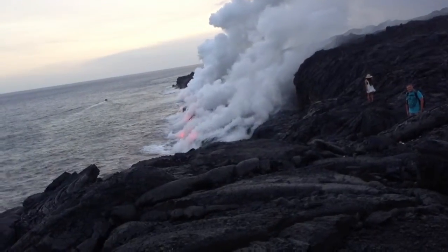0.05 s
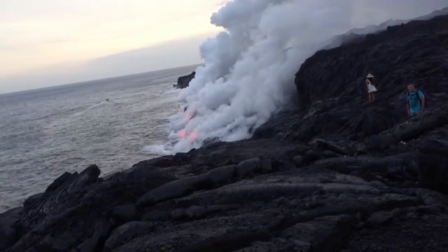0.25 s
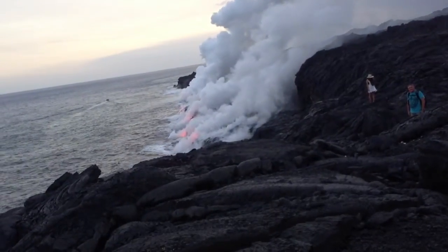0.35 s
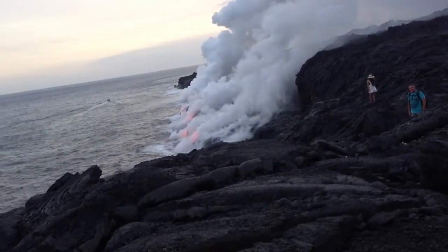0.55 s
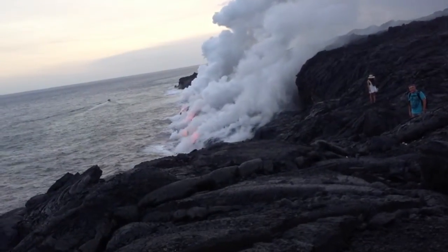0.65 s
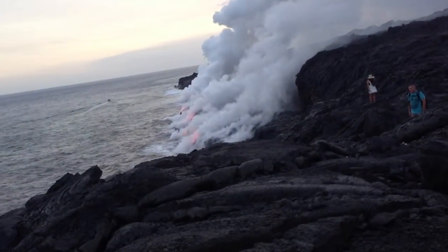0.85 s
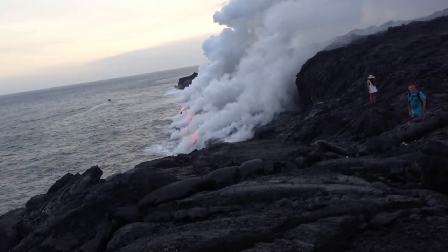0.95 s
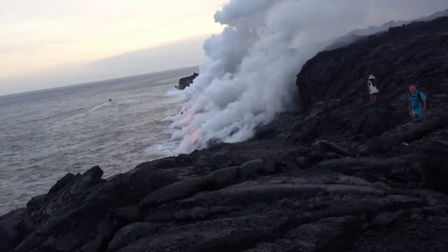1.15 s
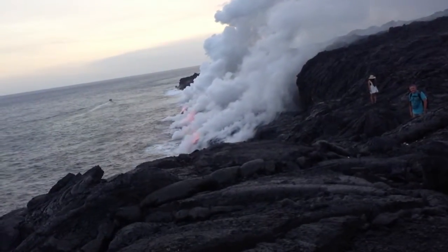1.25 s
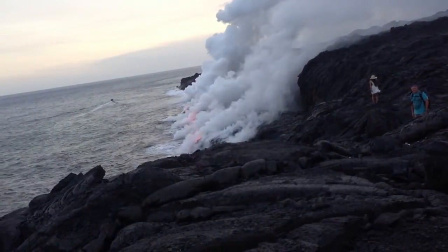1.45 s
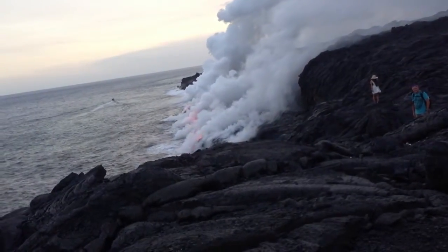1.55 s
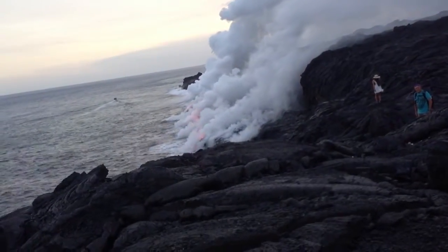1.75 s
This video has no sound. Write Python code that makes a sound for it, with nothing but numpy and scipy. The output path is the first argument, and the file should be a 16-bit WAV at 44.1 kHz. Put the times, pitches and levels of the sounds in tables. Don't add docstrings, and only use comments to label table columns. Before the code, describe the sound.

Low, uneven wind flutter dominates, right at the microphone, swelling to one heavy thump midway and gusting again near the end before sinking; far quieter surf roar, soft wave wash and airy hiss lie behind, outdoors by the sea.

```python
import sys
import numpy as np
from scipy import signal
from scipy.fft import rfft, irfft, next_fast_len
from scipy.io import wavfile
from scipy.ndimage import uniform_filter1d, map_coordinates

SR = 44100
rng = np.random.default_rng(int(sys.argv[2]) if len(sys.argv) > 2 else 0)


def how_loud(loudness_db):
    steps = np.asarray(loudness_db, float) / 20
    return 10 ** steps


def unload_wav(signal):
    wavfile.write(
        sys.argv[1],
        SR,
        np.round(np.clip(np.atleast_2d(signal).T, -1, 1) * 32767).astype(np.int16),
    )


N = 79380

# [t/s, level/dB]
WIND_STRENGTH = [(0, -44), (.27, -40), (.34, -46.5), (.44, -39), (.5, -45.5), (.6, -44), (.73, -43.5),
                 (.87, -33), (.97, -37.5), (1.05, -42), (1.08, -48), (1.2, -47), (1.3, -41), (1.35, -43),
                 (1.45, -36), (1.55, -37), (1.59, -46.5), (1.8, -48.5)]
# [f/Hz, level/dB per Hz]
RUMBLE_COLOUR = [(15, -33), (30, 1), (55, 1), (95, -4), (130, 13.5), (190, 11), (300, -73), (600, -120)]
# [t/s, level/dB]
SURF_LEVEL = [
    (0.0, -59),
    (0.01, -58.5),
    (0.476, -59),
    (0.55, -58.5),
    (0.7, -59),
    (1.142, -60),
    (1.198, -59),
    (1.212, -59.5),
    (1.668, -60),
    (1.8, -60),
]
# [f/Hz, level/dB per Hz]
ROAR_COLOUR = [(60, -45), (130, -16), (400, 0), (1000, -9.5), (1300, -9), (2300, -15.5), (3300, -15.5),
               (7000, -26.5), (15000, -55)]
# [f/Hz, level/dB per Hz]
STEAM_COLOUR = [(1000, -51), (5000, -10), (9000, 2), (15500, 0.4)]
# [t/s, peak level/dB, f/Hz]
MIDDLING_EDDIES = [(0.0182, -33.5, 192), (0.0268, -43, 177), (0.0507, -44, 215), (0.0734, -35, 194),
                   (0.082, -46, 182), (0.0926, -36, 275), (0.105, -36.5, 258), (0.1342, -40, 147),
                   (0.1493, -50, 136), (0.1613, -38.5, 205), (0.173, -37.3, 183), (0.1831, -37, 191),
                   (0.1979, -34, 224), (0.2194, -37, 218), (0.2853, -33.5, 186), (0.2932, -39, 210),
                   (0.3554, -37, 189), (0.3916, -41, 221), (0.4113, -41.5, 208), (0.4494, -37, 182),
                   (0.4727, -36.2, 340), (0.5293, -40, 192), (0.5407, -39.5, 217), (0.5591, -38, 189),
                   (0.5675, -43, 197), (0.598, -32.5, 185), (0.611, -37, 239), (0.6232, -35, 127),
                   (0.6499, -36, 235), (0.6643, -39, 153), (0.6935, -43, 149), (0.7027, -34, 150),
                   (0.723, -41, 159), (0.765, -32.5, 202), (0.7807, -35.5, 218), (0.8181, -27, 217),
                   (0.887, -26, 181), (0.8996, -32, 199), (0.944, -36, 270), (0.9717, -43, 211),
                   (1.0033, -34, 258), (1.016, -34.2, 265), (1.0282, -37, 185), (1.0359, -37, 214),
                   (1.052, -36.5, 267), (1.0604, -43.5, 220), (1.2098, -39.9, 196), (1.2343, -38, 190),
                   (1.2658, -43, 184), (1.276, -44, 230), (1.3026, -41, 176), (1.3672, -39.7, 194),
                   (1.418, -35, 235), (1.4273, -41, 160), (1.4451, -31.8, 188), (1.4843, -38, 210),
                   (1.5228, -41, 115), (1.6281, -35, 164)]
# [t/s, peak level/dB, f/Hz]
STRONG_EDDIES = [(0.113, -42, 198), (0.237, -28.5, 294), (0.2679, -37, 234), (0.4244, -29.5, 318),
                 (0.4365, -29, 203), (0.6314, -31.5, 246), (0.7926, -24, 260), (0.828, -25.5, 189),
                 (0.8463, -21.5, 181), (0.8552, -14, 202), (0.8664, -24, 220), (0.8739, -21, 302),
                 (0.9155, -30.5, 225), (1.1197, -36.5, 214), (1.289, -35, 204), (1.3186, -36, 214),
                 (1.3901, -26.5, 237), (1.401, -32, 199), (1.457, -29.5, 207), (1.465, -29, 170),
                 (1.474, -29, 227), (1.4997, -21, 177), (1.5148, -31, 268), (1.5381, -27, 198),
                 (1.544, -29, 280), (1.5611, -30.5, 220), (1.616, -30, 247)]
# [t/s, peak level/dB, f/Hz]
FURTHER_EDDIES = [(.123, -39, 165), (.2335, -32, 191), (.306, -42, 190), (.418, -36.5, 292), (.445, -38, 170),
                  (1.587, -45, 165), (1.612, -37, 320), (1.645, -42, 170), (1.67, -45.5, 191),
                  (1.72, -45.5, 184), (1.742, -44, 190), (1.76, -44, 165)]
# [t/s, peak level/dB, f/Hz]
PRESSURE_HEAVES = [(0.0432, -49, 130), (0.1147, -42, 126), (0.1414, -35, 124), (0.1947, -46, 125),
                   (0.2354, -53, 125), (0.261, -40, 119), (0.4312, -45, 119), (0.4619, -40, 119),
                   (0.5267, -38, 111), (0.5615, -41, 118), (0.6176, -35, 115), (0.6615, -47, 113),
                   (0.6995, -36, 124), (0.7256, -43, 125), (0.7623, -43, 122), (0.7828, -45, 103),
                   (0.8242, -31, 122), (0.841, -45, 140), (0.8593, -27, 125), (0.9118, -42, 121),
                   (0.9467, -43, 112), (0.9754, -38.5, 128), (1.026, -47, 121), (1.0516, -41, 112),
                   (1.1107, -52, 119), (1.2387, -44, 122), (1.2584, -45, 121), (1.3229, -40, 110),
                   (1.3625, -43, 120), (1.3962, -33, 107), (1.4554, -35, 124), (1.5017, -34, 114),
                   (1.5446, -47, 123), (1.5605, -46.5, 128), (1.5857, -46, 128), (1.6419, -40, 118)]
# [t/s, level/dB, centre f/Hz]
WAVE_SPLASHES = [(.05, -70, 1400), (.18, -69, 1200), (.36, -67, 1500), (.55, -64.5, 1200), (.58, -69, 2200),
                 (.65, -67, 3020), (.86, -64, 900), (1.19, -61.5, 1000), (1.33, -67, 2400),
                 (1.75, -63.5, 950), (.53, -73, 6000), (.69, -71, 5300), (.79, -71, 4300), (.82, -75, 6800)]
# [t/s, peak level/dB]
GRIT_TICKS = [
    (.0643, -53),
    (.383, -58),
    (.5377, -55),
    (.6973, -54),
    (.7898, -49),
    (1.5135, -56),
    (1.6312, -57),
]
# [t/s, peak level/dB, f/Hz]
EDGE_FLICKS = [(0.2312, -44, 370), (0.239, -47, 364), (0.3263, -44, 500), (0.4249, -33, 415),
               (0.4387, -46, 520), (0.4639, -44, 490), (0.6228, -48, 422), (0.7802, -42.5, 377),
               (0.791, -47, 385), (0.8183, -44, 422), (0.8253, -46, 463), (0.8378, -38, 393),
               (0.8529, -25.5, 404), (0.8702, -24.5, 373), (0.8839, -36, 363), (0.8976, -46, 426),
               (0.9083, -39, 414), (0.9502, -40, 406), (1.0003, -49, 400), (1.0497, -47, 405),
               (1.3883, -48, 384), (1.4007, -42, 440), (1.4194, -46, 383), (1.456, -38, 490),
               (1.4635, -43, 400), (1.4711, -38, 365), (1.483, -45, 405), (1.4962, -39.5, 404),
               (1.5148, -37.5, 363), (1.5228, -38, 383), (1.5362, -33.5, 467), (1.5454, -36.5, 410),
               (1.6156, -40, 394), (1.6314, -46, 450)]


def unit(x):
    return x / np.sqrt(np.mean(x ** 2) + 1e-20)


def along(points, hz):
    f, v = np.transpose(points)
    return np.interp(np.log(hz + 1), np.log(f + 1), v)


def curve(rows, s):
    return np.interp(s, *np.transpose(rows))


def wobble(rate):
    knots = rng.standard_normal(int(N * rate / SR) + 4)
    return map_coordinates(knots, [np.arange(N) * rate / SR])


def filtered(x, response):
    m = next_fast_len(N + 8192)
    spectrum = rfft(x, m) * response(np.fft.rfftfreq(m, 1 / SR))
    return irfft(spectrum, m)[..., :N]


def rush(colour, patchy_db):
    z = signal.stft(rng.standard_normal(N), nperseg=512)[2]
    across_pitch = uniform_filter1d(rng.standard_normal(z.shape), 10, 0)
    patches = unit(uniform_filter1d(across_pitch, 8, 1))
    noise = signal.istft(z * how_loud(patchy_db * patches), nperseg=512)[1][:N]
    return unit(filtered(noise, lambda hz: how_loud(along(colour, hz))))


def thuds(s, size, hz, phase, stretch=1):
    rise_cycles, fall_cycles, sag = .55, .95, .12
    before, after = 1200, 2000
    step = np.arange(-before, after)
    cycles = step / SR * hz[:, None]
    spread = np.where(cycles < 0, rise_cycles, fall_cycles)
    shape = np.exp(-.5 * (cycles / spread / stretch) ** 2)
    turns = cycles - sag * cycles * cycles / 2
    swing = size[:, None] * shape * np.cos(2 * np.pi * turns + phase[:, None])
    at = np.round(s * SR).astype(int)[:, None] + step + before
    return np.bincount(at.ravel(), swing.ravel(), N + before + after)[before:N + before]


def listed(rows, lift_db, stretch):
    s, db, hz = np.transpose(rows)
    phase = 2 * np.pi * rng.random(len(s))
    return thuds(s, how_loud(db + lift_db), hz, phase, stretch)


def small_eddies():
    per_s, level_db, flutter_db = 480, -3.5, .6
    middle_hz, hz_per_db, pitch_spread, size_db = 199.7, 3.5, 0.26, 1.2
    count = int(per_s * N / SR)
    draw = np.clip(rng.standard_normal((count, 2)), -2, 2)
    even = rng.random((count, 2))
    s = (np.arange(count) + even[:, 0]) / per_s
    wind_hz = middle_hz + hz_per_db * (curve(WIND_STRENGTH, s) + 45)
    hz = np.clip(wind_hz * np.exp(pitch_spread * draw[:, 0]), 40, 900)
    flutter = unit(thuds(s, how_loud(size_db * draw[:, 1]), hz, 2 * np.pi * even[:, 1]))
    strength_db = curve(WIND_STRENGTH, np.arange(N) / SR)
    return flutter * how_loud(strength_db + level_db + flutter_db * wobble(13.33))


def rumble():
    level_db = curve(WIND_STRENGTH, np.arange(N) / SR) - 13.5
    return rush(RUMBLE_COLOUR, patchy_db=-0.5) * how_loud(level_db)


def surf():
    level_db = curve(SURF_LEVEL, np.arange(N) / SR) + 4.5
    return how_loud(level_db) * rush(ROAR_COLOUR, patchy_db=.6)


def steam():
    level_db, swell_db = -70, .5
    return how_loud(level_db + swell_db * wobble(20.2)) * rush(STEAM_COLOUR, patchy_db=.5)


def larger_eddies():
    middling_lift_db = 0.5
    middling = listed(MIDDLING_EDDIES, middling_lift_db, stretch=0.89)
    strong = listed(STRONG_EDDIES, 0, stretch=0.92)
    further = listed(FURTHER_EDDIES, middling_lift_db, stretch=1)
    return middling + strong + further


def heaves():
    return listed(PRESSURE_HEAVES, -3.5, stretch=1)


def splashes():
    swell_s, width = .03, .2
    t = np.arange(N) / SR
    total = np.zeros(N)
    for s, db, centre in WAVE_SPLASHES:
        def band(hz):
            return np.exp(-.5 * (np.log((hz + 1) / centre) / width) ** 2)

        wash = unit(filtered(rng.standard_normal(N), band))
        total += how_loud(db) * np.exp(-.5 * ((t - s) / swell_s) ** 2) * wash
    return total


def grit():
    t60_s, lift_db, low_hz, high_hz = .03, -6, 3000, 13000
    t = np.arange(N) / SR
    shape = np.zeros(N)
    for s, db in GRIT_TICKS:
        shape += how_loud(db + lift_db - 60 * np.abs(t - s) / t60_s) * (t >= s)

    def bright(hz):
        return hz ** 2 / (hz ** 2 + low_hz ** 2) / (1 + (hz / high_hz) ** 2)

    return filtered(shape * rng.standard_normal(N), bright)


def flicks():
    return listed(EDGE_FLICKS, -0.5, stretch=1.26)


def scene():
    wind = small_eddies() + rumble() + larger_eddies() + heaves() + flicks()
    sea = surf() + steam() + splashes()
    return (wind + sea + grit())[None]


def band_limit(x):
    return signal.sosfilt(signal.butter(12, 15340, fs=SR, output="sos"), x)


def record(dry):
    cut_hz, cut_slope, top_hz = 98, 1.52, 15330

    def recorder(hz):
        wind_cut = (1j * hz / (cut_hz + 1j * hz)) ** cut_slope
        return (hz < top_hz) * wind_cut

    mix = filtered(dry, recorder)
    return band_limit(mix)


dry = scene()
out = record(dry)
unload_wav(out)
```